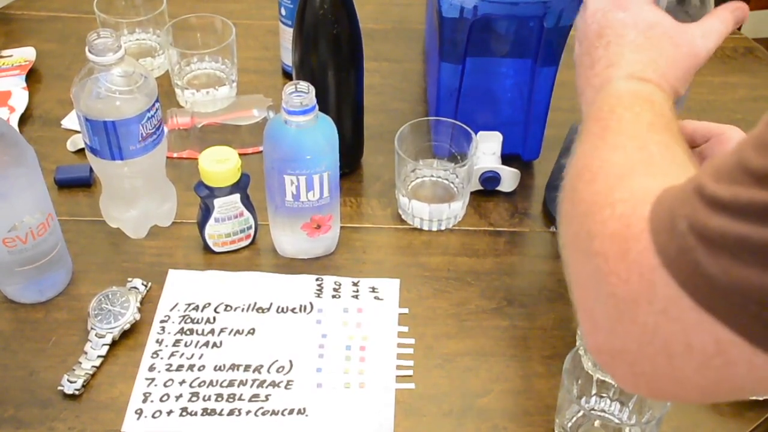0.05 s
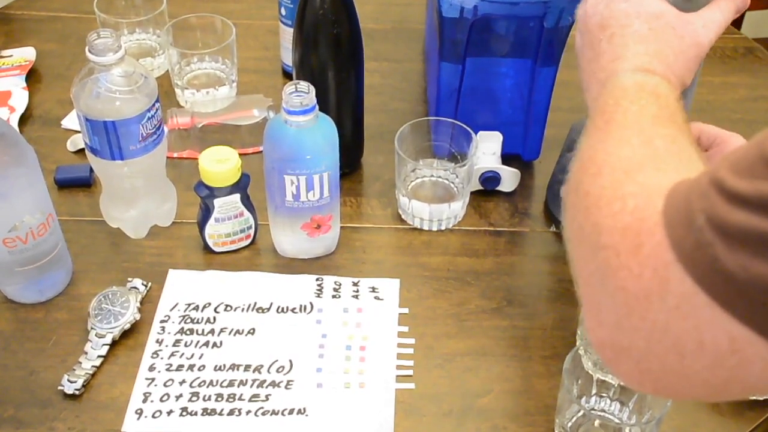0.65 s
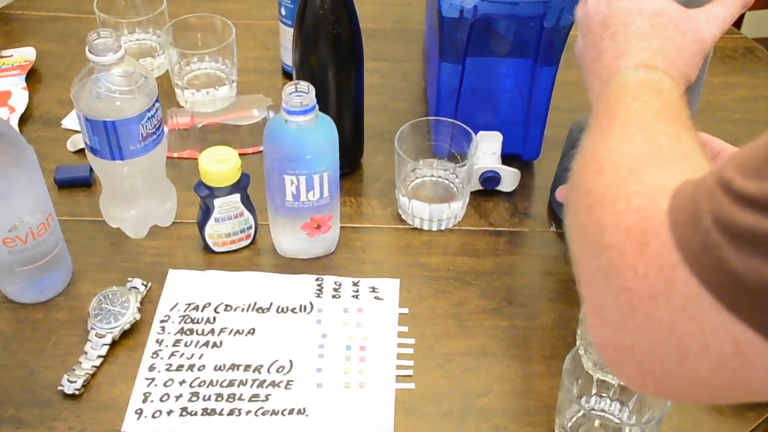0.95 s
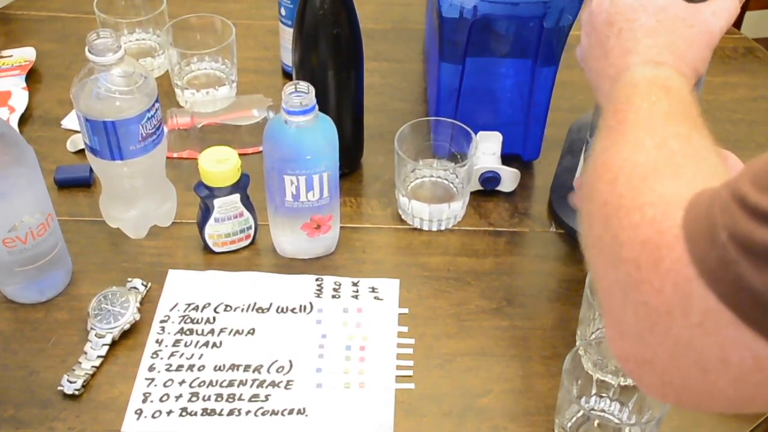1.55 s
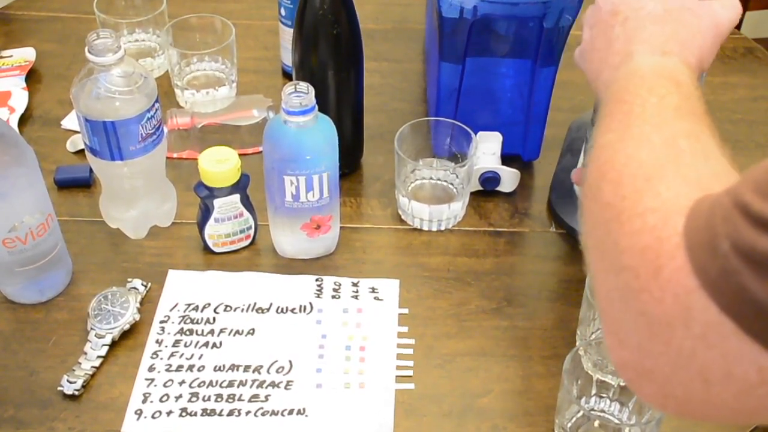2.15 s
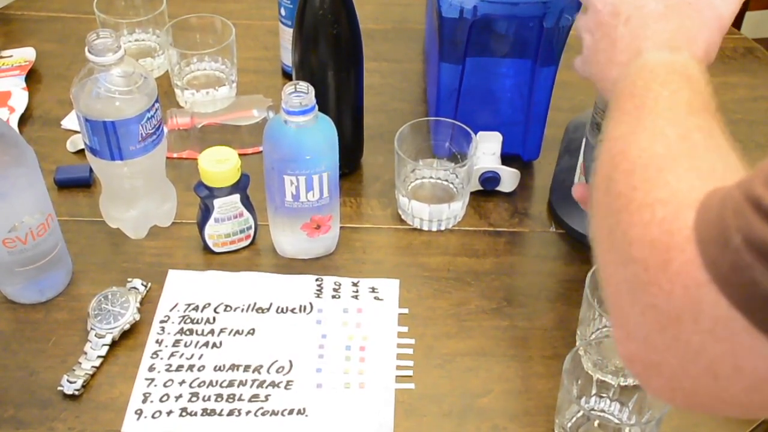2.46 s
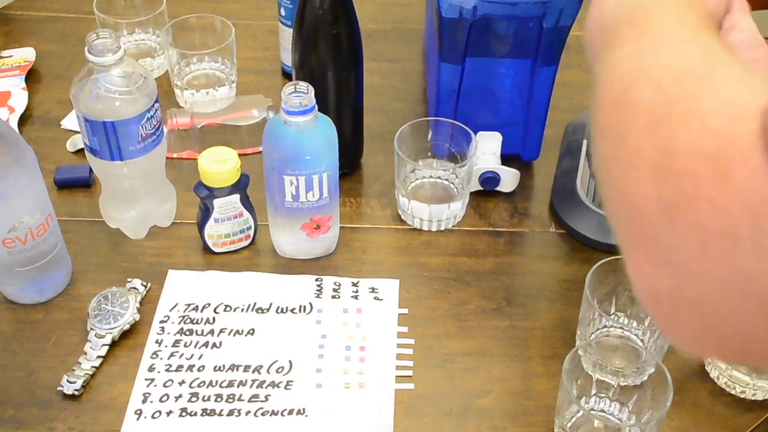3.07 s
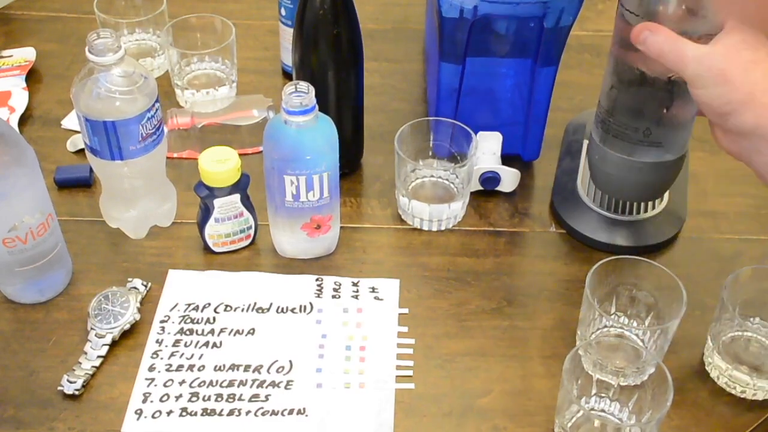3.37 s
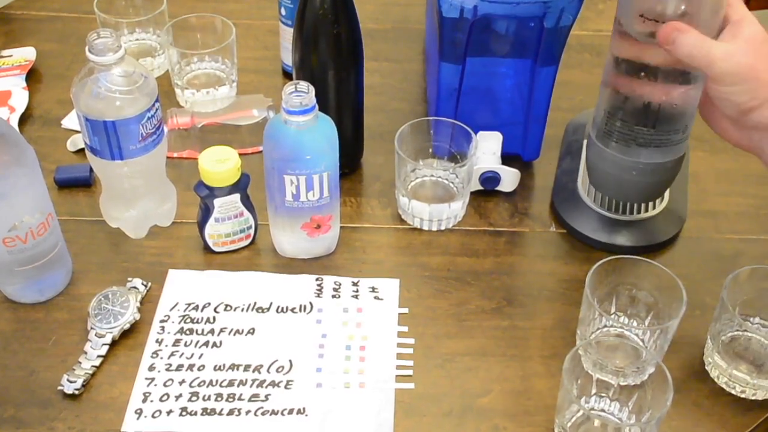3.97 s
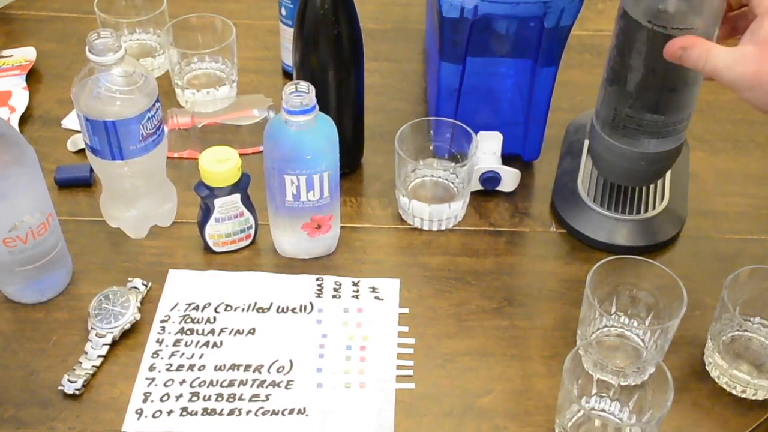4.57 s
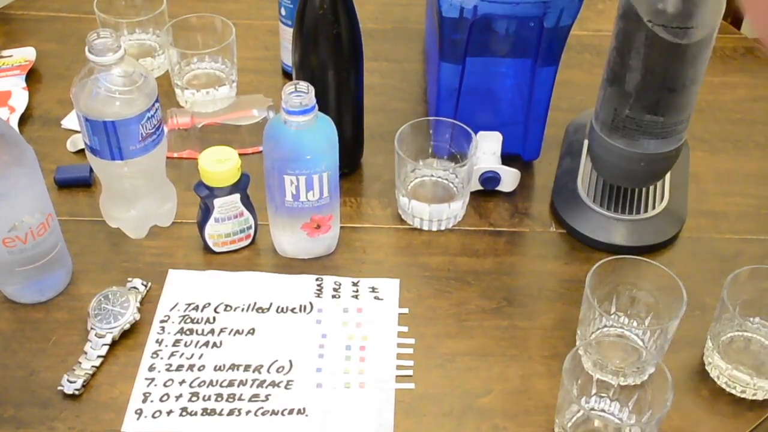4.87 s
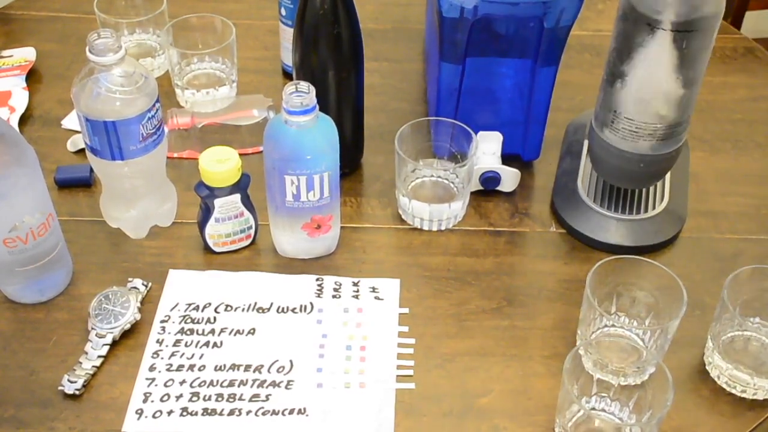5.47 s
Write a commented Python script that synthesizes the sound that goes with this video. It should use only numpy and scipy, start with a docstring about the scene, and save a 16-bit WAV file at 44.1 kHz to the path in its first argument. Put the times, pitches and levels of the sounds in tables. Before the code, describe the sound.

Irregular plastic knocks, snaps and small squeaks of a bottle being fitted into a soda maker, ending with a sudden whistling gush of gas.

```python
"""Plastic knocks, scrapes and squeaks as a bottle of water is screwed into a soda maker on a wooden
table in a small live room. Each knock is a cluster of tiny slips that shakes the housing and rings the
bottle; the threads graze, stick and slip, and the thin wall snaps under strain. Then the valve is
pressed: the first bubbles ring, and gas tears through the water with a hiss and a gliding whistle."""
import sys
import numpy as np
from scipy import signal
from scipy.fft import rfft, irfft, next_fast_len
from scipy.io import wavfile
from scipy.ndimage import uniform_filter1d

SR = 44100
rng = np.random.default_rng(int(sys.argv[2]) if len(sys.argv) > 2 else 0)


def store_pcm(level_fs):
    """Save levels as 16-bit WAV."""
    pcm = np.round(np.clip(level_fs, -1, 1) * 32767).astype(np.int16)
    wavfile.write(sys.argv[1], SR, np.atleast_2d(pcm).T)


N = 248283
TIME_S = np.arange(N) / SR
CRACK_S, OPEN_S = 5.496, 5.53  # valve starts to open; is wide open

# Housing response to a contact. Each row: frequency in Hz, gain in dB.
HOUSING_EQ = [(30, -43), (100, -37), (190, -21.5), (300, -7.5), (500, -2), (1100, 3), (2000, -1),
              (2900, -1), (3900, -2), (6300, 0.5), (9000, -7), (13000, -13), (15500, 0)]
# Ribs and threads that sing when scraped. Each row: frequency in Hz, width in Hz, relative level in dB.
RIB_MODES = [(7650, 600, 5), (10700, 1100, 4)]


def amp(db):
    return 10 ** (np.asarray(db) / 20)


def unit_rms(x):
    return x / np.sqrt(np.mean(x ** 2) + 1e-20)


def unit_energy(x):
    return x / np.sqrt(np.sum(x ** 2) + 1e-20)


def interp_log_hz(points, hz):
    point_hz, value = np.transpose(points)
    return np.interp(np.log(hz + 1), np.log(point_hz + 1), value)


def add(mix, start_s, sound):
    part = mix[max(round(start_s * SR), 0):][:len(sound)]
    part += sound[:len(part)]


def equalize(x, eq, size=2048):
    """Minimum-phase filter through (Hz, dB) points."""
    log_gain = np.log(amp(interp_log_hz(eq, abs(np.fft.fftfreq(size, 1 / SR)))))
    taps = np.fft.ifft(np.exp(np.conj(signal.hilbert(log_gain)))).real
    return signal.fftconvolve(x, taps[:size // 2])[:len(x)]


def waver(n, rate_hz):
    """Low-passed noise, rms 1."""
    size = next_fast_len(n, True)
    rolloff = 1 + (np.fft.rfftfreq(size, 1 / SR) / rate_hz) ** 4
    return unit_rms(irfft(rfft(rng.standard_normal(size)) / rolloff, size)[:n])


def whiten(x, passes=3):
    """Evens out a burst's spectral notches; keeps its decay."""
    def envelope(y):
        return np.sqrt(uniform_filter1d(y ** 2, 64).clip(1e-20))

    decay = envelope(x)
    for _ in range(passes):
        spectrum = rfft(x)
        x = irfft(spectrum / (abs(spectrum) + 1e-12), len(x))
        x = x * decay / envelope(x)
    return unit_energy(x)


def resonate(x, hz, width_hz):
    """Unity-gain resonance."""
    pole = np.exp((2j * np.pi * hz - np.pi * width_hz) / SR)
    return 2 * signal.lfilter([1 - abs(pole)], [1, -pole], x).real


def boost(x, modes):
    """Adds resonances on top of x."""
    return x + sum(amp(db) * signal.lfilter(*signal.iirpeak(hz, hz / width_hz, fs=SR), x)
                   for hz, width_hz, db in modes)


def background(grain=0.15, air_db=-67.5):
    """Hands rub on plastic over the still air of the room."""
    # Sliding hands. Each row: time in seconds, level in dB.
    rub_levels = [(0, -53.5), (.43, -62.5), (.7, -56.5), (2.9, -56), (3.45, -60.5), (4.2, -61), (4.3, -68),
                  (4.97, -57.5), (5.2, -63)]
    # Spectra of rubbing and air. Each row: frequency in Hz, gain in dB.
    rub_eq = [(40, -53.5), (100, -28.5), (190, -10), (330, -8.5), (480, -1), (620, -6), (900, -2),
              (1300, -8), (2000, -12.5), (5000, -23), (9000, -29.5), (15500, -43.5)]
    air_eq = [(30, -45), (110, -32.5), (280, -2), (550, 10.5), (1200, -14), (3000, -17), (8000, -52),
              (15500, -21)]
    friction = rng.standard_normal(N) * np.exp(grain * waver(N, 210)) * amp(waver(N, 4.7))
    rub = amp(np.interp(TIME_S, *np.transpose(rub_levels))) * unit_rms(equalize(friction, rub_eq))
    air = amp(air_db) * unit_rms(equalize(rng.standard_normal(N), air_eq, size=8192))
    return rub + air


def reflections(gap_s=0.0021, build_s=0.0046):
    """Dense echoes from table and walls; each band dies at its own rate."""
    # Room decay. Each row: frequency in Hz, T60 in seconds.
    decay_times = [(200, 0.3), (530, 0.31), (1400, 0.33), (3700, 0.35), (10000, 0.16)]
    hz, t, bands = signal.stft(rng.choice([-1., 1.], 24576), SR, nperseg=256)
    decay = amp(-60 * t / interp_log_hz(decay_times, hz)[:, None])
    tail = signal.istft(bands * decay, SR, nperseg=256)[1]
    onset = np.clip((np.arange(len(tail)) / SR - gap_s) / build_s, 0, 1)
    return unit_energy(tail * onset)


def room(x, wet_db=-1, patterns=4):
    """Room reverberation, crossfading between echo patterns so that no single pitch rings on."""
    position, wet = TIME_S * np.pi, np.zeros(N)
    for k in range(patterns):
        distance = abs((position - k + patterns / 2) % patterns - patterns / 2)
        share = np.clip(1 - distance, 0, 1)
        wet += signal.oaconvolve(x * np.sqrt(share), reflections())[:N]
    return amp(wet_db) * wet


def wall_ring(t, t60_s, count=36):
    """A random set of the thin wall's high modes."""
    hz = np.geomspace(1500, 13000, count)[:, None] * rng.uniform(.94, 1.06, (count, 1))
    phase = rng.random((count, 1))
    modes = np.sqrt(hz) * np.sin(2 * np.pi * (hz * t + phase))
    return unit_energy(modes.sum(0) * amp(-60 * t / t60_s))


def grazes(gain_db=-3, wall_db=-6, ribs_db=-7):
    """Threads and edges graze: a dry crackle swells, fades and lightly rings wall and ribs."""
    # Each row: start in seconds, drag time in seconds, relative level in dB.
    drags = [(.07, 0.041, -70), (.47, 0.014, -59), (.543, 0.0073, -49), (.806, 0.011, -53),
             (.856, 0.0083, -50), (1.013, 0.0034, -41.5), (1.122, 0.0056, -51), (1.452, 0.021, -54.5),
             (1.61, 0.019, -62), (1.778, 0.014, -46.5), (1.868, .005, -53.5), (2.106, 0.0082, -56),
             (2.55, .007, -54), (2.82, 0.043, -72), (3.125, .012, -64), (3.208, 0.0088, -59),
             (3.635, 0.013, -58), (4.038, 0.0047, -66), (4.629, 0.009, -49.5), (4.74, .01, -58),
             (4.811, .006, -55.5)]
    # Grit spectrum. Each row: frequency in Hz, gain in dB.
    grit_eq = [(1000, -33), (3500, -9), (6500, 5.5), (11000, -1.5), (15500, -5)]
    t, out = np.arange(12288) / SR, np.zeros(N)
    for start_s, drag_s, db in drags:
        age = t / drag_s
        crackle = unit_rms(rng.standard_normal(len(t)) * np.exp(waver(len(t), 1500)))
        grit = crackle * age * np.exp(1 - age)
        wall = signal.fftconvolve(grit, wall_ring(t[:2048], t60_s=0.02, count=48))[:len(t)]
        add(out, start_s, amp(db + gain_db) * (grit + amp(wall_db) * wall))
    ribs = [(hz, width_hz, db + ribs_db) for hz, width_hz, db in RIB_MODES]
    return equalize(boost(out, ribs), grit_eq)


def squeaks(jitter=0.15, gain_db=-1):
    """Plastic sticks and slips: short tones, uneven in pitch and level."""
    # Each row: start in seconds, length in seconds, pitch in Hz, relative level in dB, roughness 0-1.
    slips = [(0, 0.0081, 1110, -44.5, 0.32), (0.064, .014, 1159, -42, .3), (0.747, 0.019, 849, -32, 0.25),
             (2.637, 0.026, 1019, -30, 0.89), (2.662, .032, 1043, -37.5, 0.87),
             (2.737, .024, 883, -43.5, 0.5), (2.994, .042, 585, -29.5, 0.39),
             (3.015, 0.039, 601.4, -25.5, 0.17), (3.123, 0.026, 1153, -40.5, 0.38),
             (3.215, .022, 1027, -40, 0.53), (3.558, 0.015, 1013, -44.5, 0.37)]
    # Small parts radiate little bass. Each row: frequency in Hz, gain in dB.
    radiation_eq = [(40, -61), (130, -35), (350, 0.5)]
    out = np.zeros(N)
    for start_s, length_s, hz, db, roughness in slips:
        n = int(length_s * SR)
        fall_db = 19 * (hz / 1000) ** 2  # per harmonic: low squeaks are richer
        cycles = np.cumsum(hz * (1 + jitter * roughness * waver(4096, 340)[:n])) / SR
        tone = sum(amp(-fall_db * (k - 1)) * np.sin(2 * np.pi * k * cycles) for k in range(1, 7))
        envelope = (1 + roughness * waver(4096, 160)[:n]) * signal.windows.tukey(n, .6)
        add(out, start_s, amp(db + gain_db) * unit_rms(tone * envelope))
    return equalize(out, radiation_eq)


def bottle_ring_db(time_s, seated_s=3.1):
    """The hand damps the bottle until it is seated."""
    return -17 if time_s > seated_s else -28.5


def contact(contact_s, note_hz, note_db, ring_db, ribs_db, eq, body_db=-3, crack_db=-14, note_q=10):
    """A cluster of tiny slips shakes the housing and rings bottle and ribs."""
    # Filled bottle in its holder. Each row: frequency in Hz, relative level in dB, T60 in seconds.
    bottle_modes = [(500, 0, .06), (1580, -4, .06), (2800, 0, .05), (4250, -12, .08)]
    t, body_t60_s = np.arange(8192) / SR, 0.066
    age = 1.5 * t / contact_s
    rasp = np.exp(.4 * waver(len(t), 220))  # surfaces catch and let go
    slips = whiten(rng.standard_normal(len(t)) * rasp * age ** 2 * np.exp(-age))
    body = amp(body_db) * whiten(rng.standard_normal(len(t)) * amp(-60 * t / body_t60_s), passes=1)
    body += amp(-5) * wall_ring(t, t60_s=.035)
    body[0] += amp(crack_db)
    detune = 1 + .035 * rng.uniform(-1, 1)  # each contact rings at a slightly different, random pitch
    bottle = sum(amp(db) * unit_energy(np.sin(2 * np.pi * hz * detune * t) * amp(-60 * t / t60_s))
                 for hz, db, t60_s in bottle_modes)
    blow = signal.fftconvolve(slips, body + amp(ring_db) * bottle)[:len(t)]
    ribs = sum(amp(db) * resonate(resonate(blow, hz * detune, width_hz), hz * detune, width_hz)
               for hz, width_hz, db in RIB_MODES)
    pitched = boost(blow, [(note_hz, note_hz / note_q, note_db)])
    return equalize(pitched, eq) + amp(ribs_db) * ribs


def snaps(contact_s=.0007):
    """Thin plastic snaps under strain: sharp crack, little body."""
    # Each row: start in seconds, relative level in dB, note in Hz, note boost in dB.
    cracks = [(.466, -11, 1840, 5), (.542, 1.5, 2700, 5), (0.984, -10.5, 1000, 10), (1.436, -15, 2000, 0),
              (1.449, -8.5, 2910, 11.5), (1.534, -6.5, 2400, 1), (1.772, -14.5, 3030, 18),
              (1.949, -10.5, 2450, 12.5), (2.284, -23, 3400, 8), (3.618, 2, 2840, 8), (4.117, -20, 2980, 6),
              (4.437, 6, 2180, 6.5)]
    # Snap spectrum. Each row: frequency in Hz, gain in dB.
    snap_eq = [(420, -1), (950, -2), (2200, -2), (5000, -14.5), (10500, -32.5), (15750, -26)]
    out = np.zeros(N)
    for start_s, db, note_hz, note_db in cracks:
        snap = contact(contact_s, note_hz, note_db, ring_db=bottle_ring_db(start_s) - 2, ribs_db=-26,
                       eq=snap_eq, body_db=-7.5, crack_db=-3.5, note_q=1 / .13)
        add(out, start_s, amp(db) * snap)
    return equalize(out, HOUSING_EQ)


def knocks(pivot_hz=786, tilt_limit_hz=7000):
    """Bottle and holder collide; each knock has its own brightness and the note of the part touched."""
    # Each row: start in seconds, contact time in seconds, relative level in dB, tilt in dB per octave,
    # note in Hz, note boost in dB.
    hits = [(.055, 0.002, -12.5, 1, 1180, 7), (.485, 0.0059, -4, -0.2, 1700, 4),
            (.749, 0.00047, 6, 2, 880, 1), (.766, 0.0013, 3, -2, 874, 10.5),
            (.8045, 0.0011, 4.5, .3, 1050, -6), (.826, .007, 4, .5, 966, -12), (.856, 0.0038, 2, 0, 380, 6),
            (1.013, 0.0026, 12, 2, 1050, -1), (1.05, 0.022, 2.5, 1.7, 910, 6),
            (1.122, 0.0015, 7, 0.5, 496, 4), (1.134, 0.0039, 7.5, -3.5, 476, 0.5),
            (1.463, 0.0055, 7, -2, 472, 5), (1.608, .004, -5.5, 1.5, 1030, -4),
            (1.787, 0.0097, 12, -1.9, 1010, -3.5), (1.868, 0.0043, 2, -1.5, 1050, -5),
            (1.948, 0.0038, 1.5, -4, 344, 9.5), (1.992, 0.0042, -2.5, -4.5, 390, 12),
            (2.105, .003, 4.5, -4, 348, -1), (2.284, .0035, -15, 0, 920, 4),
            (2.321, 0.0031, -10.5, -9, 520, 9), (2.503, 0.0037, 1, -5, 300, -2),
            (2.519, 0.0051, 8.5, -2.05, 288, 14.5), (2.557, .0038, 4.5, -3, 280, 6),
            (2.692, .0014, -0.5, 4, 1300, 2.5), (3.016, 0.0082, 13.5, -1, 620, 3.5),
            (3.12, 0.0081, -6.5, -0.5, 575, 13), (3.208, .0037, -5.5, 0.5, 2000, 7),
            (3.545, 0.0024, -7.5, -4, 483, 7.5), (3.647, 0.0072, -1.5, 0.8, 1700, 7),
            (3.68, 0.0034, -8.5, -1, 466, 12.5), (3.846, 0.0023, -16, -2, 1540, 10.5),
            (4.432, 0.0035, 10, -1.1, 900, 3.5), (4.441, 0.003, 7, -0.5, 347, 5.5),
            (4.525, 0.0124, -2.5, 0.5, 990, 8), (4.629, 0.0023, 10.5, 0.3, 1470, 1),
            (4.679, 0.0053, 6.5, -2.3, 1480, 2), (4.721, 0.0043, 2.5, -1.3, 1450, 3),
            (4.752, 0.0029, 0.5, -1, 331, 9), (4.811, .0012, 1, -1.4, 1130, 4)]
    # Knock spectrum before tilt. Each row: frequency in Hz, gain in dB.
    knock_eq = [(420, -0.5), (950, 0.5), (2200, -6), (5000, -16), (10500, -32.5), (15750, -50)]
    eq_hz, eq_db = np.transpose(knock_eq)
    octaves = np.log2(np.minimum(eq_hz, tilt_limit_hz) / pivot_hz)
    out = np.zeros(N)
    for start_s, contact_s, db, db_per_octave, note_hz, note_db in hits:
        tilt_db = db_per_octave * octaves
        knock = contact(contact_s, note_hz, note_db, ring_db=bottle_ring_db(start_s),
                        ribs_db=-37.5 + tilt_db[-1], eq=list(zip(eq_hz, eq_db + tilt_db)))
        add(out, start_s, amp(db) * knock)
    return equalize(out, HOUSING_EQ)


def first_bubbles(rise=0.008):
    """A bubble swells off the nozzle, rings and rises slightly in pitch."""
    # Each row: start in seconds, pitch in Hz, relative level in dB, life in seconds.
    bubbles = [(5.259, 1700, -26.5, 0.0022), (5.4426, 1770, -25.5, 0.0025), (5.452, 1680, -27.5, 0.0051),
               (5.489, 716, -28.5, 0.0059)]
    t, out = np.arange(2048) / SR, np.zeros(N)
    for start_s, hz, db, life_s in bubbles:
        age = t / life_s
        envelope = age ** 2 * np.exp(1 - age ** 2 / (1 + age / 4))
        cycles = np.cumsum(hz * (1 + rise * age)) / SR
        add(out, start_s, amp(db) * envelope * np.sin(2 * np.pi * cycles))
    return out


def leak(start_s=5.445, hz=3078, gain_db=-49.5):
    """A weak leak: one thin, steady tone until the valve opens."""
    t, out = np.arange(0, CRACK_S - start_s, 1 / SR), np.zeros(N)
    tone = np.sin(2 * np.pi * hz * t) * signal.windows.tukey(len(t), .25)
    add(out, start_s, amp(gain_db) * unit_rms(tone))
    return out


def sputter(gain_db=-21, low_hz=850, high_hz=3000, life_s=0.0024, rise=0.02, count=40):
    """Valve wide open: bubbles of mixed size tear off the jet and ring briefly."""
    age, out = np.arange(1024) / SR / life_s, np.zeros(N)
    envelope = age * np.exp(1 - age)
    for when, pitch, strength in rng.random((count, 3)):
        hz = low_hz * (high_hz / low_hz) ** pitch * (1 + rise * age)
        bubble = envelope * np.sin(2 * np.pi * np.cumsum(hz) / SR)
        add(out, OPEN_S + when * (N / SR - OPEN_S), amp(gain_db) * (.5 + strength) * bubble)
    return out


def nozzle_whistle(t, pressure, crack_hz=2920, open_hz=3410, filled_hz=2438, jitter=.027, flutter=0.61):
    """Unsteady tone, rms 1: rises as the valve opens, sinks under back pressure."""
    # Relative level in dB of each harmonic, fundamental first.
    harmonics_db = [0, -7, -4, -12, -15]
    hz = np.interp(t, [CRACK_S, OPEN_S], [crack_hz, open_hz]) + (filled_hz - open_hz) * pressure
    cycles = np.cumsum(hz * (1 + jitter * waver(N, 500)[-len(t):])) / SR
    partials = [amp(db) * np.sin(2 * np.pi * k * cycles) for k, db in enumerate(harmonics_db, 1)]
    octave_gain = amp(np.interp(t, [5.497, 5.518], [20, 0]))  # octave leads while the valve opens
    partials[1] *= octave_gain
    tone = sum(partials) / np.sqrt(octave_gain)
    return unit_rms(tone * (1 + flutter * waver(N, 220)[-len(t):]))


def gas_jet(fill_s=.03, lumpiness=0.21, whistle_full_db=-12):
    """The jet whistles, hisses and churns the water in lumps; back pressure tames whistle and hiss."""
    # The valve spits, half opens, opens fully. Each row: time in seconds, flow in dB.
    flow = [(5.484, -52), (5.497, -15.5), (5.503, -29.5), (5.513, -8), (5.526, -4.5), (5.533, 0)]
    # Bottle resonances under the jet. Each row: frequency in Hz, width in Hz, boost in dB.
    cavity_modes = [(630, 70, -1), (1240, 70, 3), (1730, 50, 6), (2860, 90, 7), (3430, 70, 6),
                    (5960, 90, 4)]
    # Spectra of hiss and churning water. Each row: frequency in Hz, gain in dB.
    hiss_eq = [(60, -65), (300, -48), (800, -34), (1800, 1), (3000, 3.5), (4200, 2), (6000, 0.5),
               (8000, -12), (10000, 7.5), (11500, -12), (13000, -3.5), (15500, -25)]
    churn_eq = [(30, -37), (120, -71), (230, -15.5), (350, -8.5), (550, 3.5), (800, 0.5), (1250, 5),
                (1700, 4), (2050, -4), (2800, -17), (4000, -12.5), (9000, -20.5)]
    t, out = TIME_S[int(flow[0][0] * SR):], np.zeros(N)
    flow_db = np.interp(t, *np.transpose(flow))
    pressure = 1 - np.exp(-(np.maximum(t - OPEN_S, 0) / fill_s) ** 2)  # back pressure, 0-1
    whistle_db = -16.5 - 5 * pressure + 2 * np.minimum(flow_db - whistle_full_db, 0)
    whistle = amp(whistle_db) * nozzle_whistle(t, pressure)
    lumps = np.exp(lumpiness * waver(N, 470))

    def turbulence(eq):
        noise = (rng.standard_normal(N) * lumps)[-len(t):]
        return unit_rms(equalize(boost(noise, cavity_modes), eq))

    hiss = amp(-15 - 9.5 * pressure + flow_db) * turbulence(hiss_eq)
    churn = amp(-18 + flow_db) * turbulence(churn_eq)
    add(out, t[0], whistle + hiss + churn)
    return out


def scene():
    """Plastic, bubbles and gas in the room; stereo from mid and side."""
    # Stereo width, mostly treble. Each row: frequency in Hz, side gain in dB.
    side_eq = [(100, -22), (500, -24), (1000, -26), (2800, -15), (6000, -8), (9000, -1), (14000, 2.5)]
    plastic = knocks() + snaps() + grazes()
    squeaking, plinks = squeaks(), first_bubbles()
    gas = gas_jet() + sputter() + leak()
    direct = plastic + squeaking + plinks + amp(-1.5) * gas
    send = plastic + amp(-3.5) * squeaking + amp(-2.5) * plinks + amp(-7) * gas
    mid = direct + room(send) + background()
    side_send = amp(-3) * send + amp(-19) * gas  # extra gas: the jet spreads widely
    side = equalize(room(side_send, patterns=2) + background(), side_eq)
    return np.array([mid + side, mid - side])


def record(dry):
    """Clips the peaks, then low-passes at 15750 Hz."""
    lowpass = signal.firwin(511, 15750, window=("kaiser", 9), fs=SR)
    return signal.oaconvolve(np.clip(dry, -.9, .9), lowpass[None], "same")


dry = scene()
out = record(dry)
store_pcm(out)
```